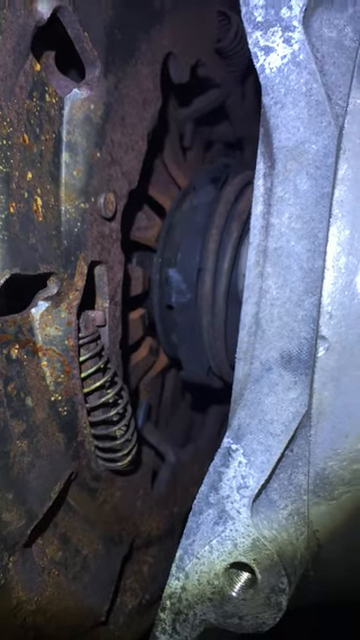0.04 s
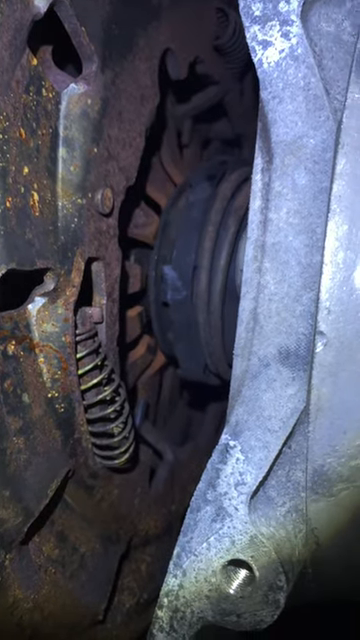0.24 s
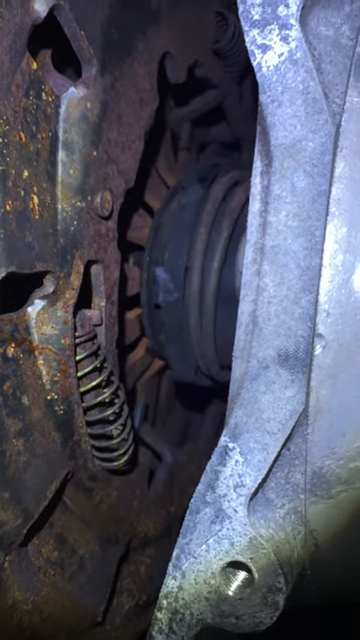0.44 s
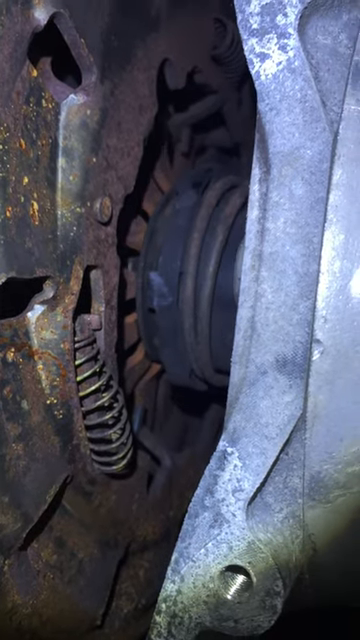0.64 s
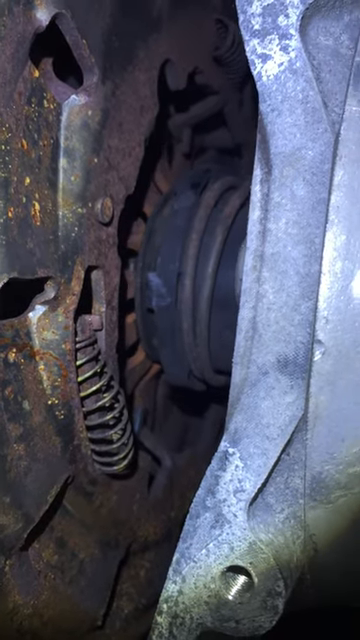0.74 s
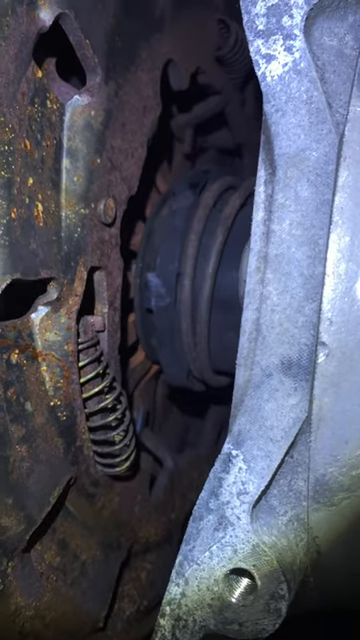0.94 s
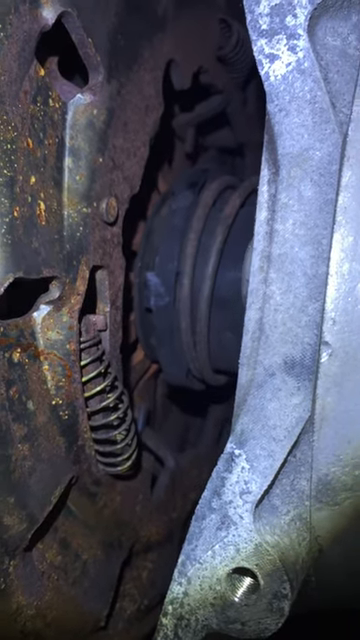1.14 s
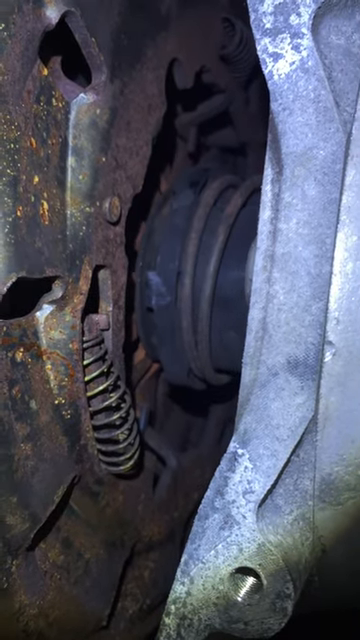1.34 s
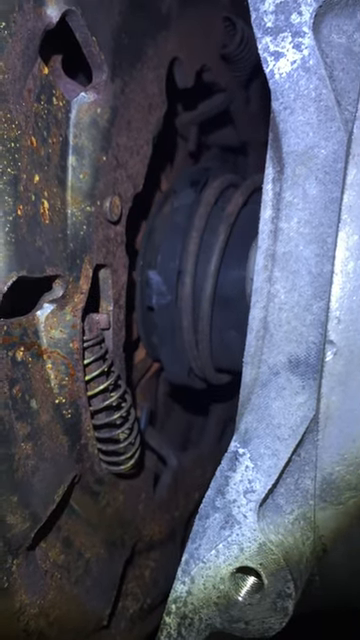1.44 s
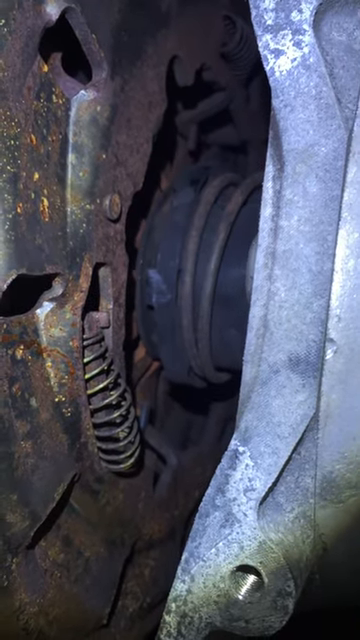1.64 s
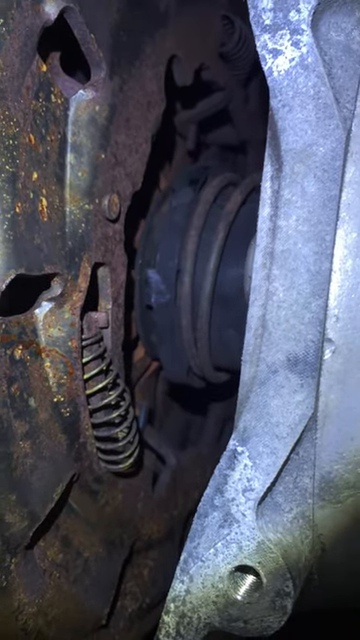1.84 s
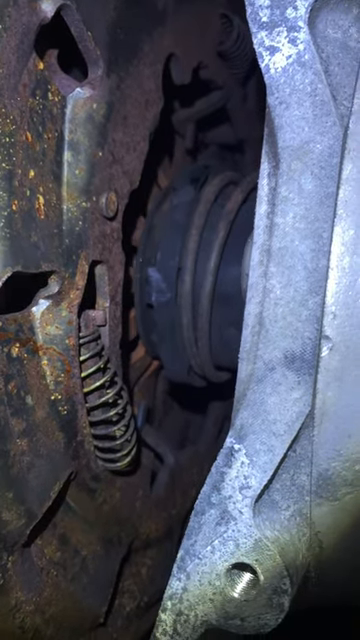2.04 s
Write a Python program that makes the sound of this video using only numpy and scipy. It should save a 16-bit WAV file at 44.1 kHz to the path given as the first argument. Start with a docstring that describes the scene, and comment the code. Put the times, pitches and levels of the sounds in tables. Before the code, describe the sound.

Close up beneath a vehicle, a metal clutch linkage gives a short squeak and a rough creak, then judders loudly against its housing and slides on with a faint whistle. Outdoors, a distant engine fades under rumble and faint insects.

```python
"""Over a low rumble come a soft knock, a falling squeak, a gritty creak and then a loud judder:
a dry clutch release mechanism is worked under a vehicle. Squeak, creak and judder are stick-slip
pulses that ring the metal bell housing close by; afterwards the metal slides on with a faint whistle.
Behind it all, an engine drone sinks away and insects sing, faint and high."""
import sys
import numpy as np
from scipy import signal
from scipy.fft import rfft, irfft
from scipy.io import wavfile
from scipy.ndimage import uniform_filter1d

SR = 44100
rng = np.random.default_rng(int(sys.argv[2]) if len(sys.argv) > 2 else 0)


def store_wav(level_fs):
    """Save 16-bit WAV to argv[1]."""
    pcm = np.round(np.clip(np.atleast_2d(level_fs), -1, 1) * 32767)
    wavfile.write(sys.argv[1], SR, pcm.T.astype(np.int16))


N = 92610


# single slips of the judder: t/s, strength/dB, extra treble/dB
JUDDER_SLIPS = [(1.1450, 8.5, -7.5), (1.1552, 9, 5.5), (1.1682, 6, 5.5), (1.1818, 0.5, 8.5),
                (1.1952, 3.5, -22)]
# its clanking tone: f/Hz, relative level/dB
JUDDER_EQ = [(220, -35), (380, -5.5), (600, -10), (780, -5.5), (890, 0.5), (1020, -8), (1210, 3),
             (1350, -1.5), (1570, 4), (1730, -0.5), (1830, -5), (2100, 4), (2400, 2), (2850, 1),
             (3500, -2.5), (4000, 1), (6400, -9), (7350, -15), (8100, -9), (9900, -13), (10600, -21.5),
             (15500, -24)]

def judder(body):
    """Five hard slips in quick succession hammer the housing."""
    return ring_housing(snaps(JUDDER_SLIPS), body, JUDDER_EQ, tones_db=-7.5)


# falling glide of the squeak: t/s, slip rate/Hz, level/dB
SQUEAK_GLIDE = [(.625, 532, -41), (.632, 509, -24.5), (.643, 464.7, -24.5), (.66, 432.7, -27.5),
                (.672, 415, -32), (.684, 393, -33.5), (.698, 383, -57.5), (.708, 374, -70)]
# its piercing tone: f/Hz, relative level/dB
SQUEAK_EQ = [(500, -15), (950, -8), (1130, -0.5), (1290, 5), (1480, -12.5), (1720, 0), (2000, -5.5),
             (2280, 2.5), (2900, -4.5), (3280, -3), (3600, -4.5), (4130, 5.5), (4650, -7.5), (6000, -7),
             (7200, -15.5), (10000, -20.5), (15500, -31)]

def squeak(body):
    """Nearly regular slips make a pitch, ringing the housing and the rubbing part's own resonance."""
    slips = stick_slip(SQUEAK_GLIDE, jitter=.022, scatter_db=1)
    squeal = undb(-8.5) * ring(slips, mode(hz=4150, t60=.028))
    return ring_housing(slips, body, SQUEAK_EQ, tones_db=-10.5) + squeal


# falling glide of the creak: t/s, slip rate/Hz, level/dB
CREAK_GLIDE = [(.728, 796, -22.5), (.741, 774.3, -25), (.75, 677, -29), (.785, 560.4, -28),
               (.803, 497.7, -28), (.832, 439.2, -28), (.845, 389, -33.5), (.862, 266, -57)]
# its darker tone: f/Hz, relative level/dB
CREAK_EQ = [(500, -5.5), (850, -9), (1250, 2.5), (1480, -5), (2500, 2), (3200, 0), (3600, -5), (4450, 0),
            (5100, -11), (6600, -10), (7700, -23), (10000, -30), (15500, -49)]

def creak(body):
    """Ragged slip timing roughens the pitch into grit."""
    slips = stick_slip(CREAK_GLIDE, jitter=.25, scatter_db=1.5)
    return ring_housing(slips, body, CREAK_EQ, tones_db=-11.5)


# ticks at the onsets of squeak and creak: t/s, strength/dB, extra treble/dB
BREAKAWAY_TICKS = [(.606, 1, -33.5), (.7282, -9, 12.5), (.7335, -6.5, 9)]
# their thin, bright tone: f/Hz, relative level/dB
TICK_EQ = [(800, -29), (1500, -9), (2100, -4), (2550, 7.5), (3300, -1), (4500, 4), (5600, -8), (6500, 3),
           (7700, -15), (9500, -18), (11000, -29), (15500, -33)]

def ticks(body):
    """The contact ticks against the housing as it breaks loose."""
    return ring_housing(snaps(BREAKAWAY_TICKS), body, TICK_EQ, tones_db=-9)


def stick_slip(glide, jitter, scatter_db):
    """The contact catches and lets go at the slip rate, each cycle different in length and force."""
    times, hz, db = np.array(glide).T
    s, slips = times[0], []
    for stretch, force in rng.standard_normal((200, 2)):
        if s < times[-1]:
            rate = np.interp(s, times, hz)
            makeup_db = 10 * np.log10(SR / rate)  # keeps the power independent of the rate
            slips.append((s, np.interp(s, times, db) + makeup_db + scatter_db * force))
            s += np.exp(jitter * stretch) / rate
    return pulses(slips)


def snaps(rows):
    """Single slips, each with its own treble tilt."""
    return sum(colour(pulses([(s, db)]), [(1210, 0), (11990, treble_db)]) for s, db, treble_db in rows)


# clear ringing tones of the clank, housing resonances and overtones of the judder's rapid repetition:
# f/Hz, level/dB, t60/s
CLANK_TONES = [(1222, -20, .28), (1494, -14, .12), (1576, -12, .12), (1620, -11, .12), (1660, -19, .38),
               (1800, -15, .1), (2090, -23, .65), (2311, -15, .12), (2431, -14, .14), (2799, -12, .11),
               (2879, -12, .11), (3015, -19, .2), (3096, -13, .15), (3243, -16, .16), (4156, -15, .1),
               (5368, -15, .1), (6380, -7, .14), (7876, -10, .08), (8371, -15, .17), (9262, -11, .08)]
# early echoes inside the housing: delay/s, relative level/dB
HOUSING_ECHOES = [(.0028, -10), (.0041, -15), (.0055, -15)]

def clank():
    """The sound of one slip: a dense ring (echoes, quick wash, duller tail) and clear ringing tones."""
    t = clock()
    attack = np.minimum(undb(-18.5) + t / .0025, 1)
    wash = energy(rng.standard_normal(N) * fade(t60=.035) * attack)
    dull_noise = signal.sosfilt(signal.butter(2, 3430, fs=SR, output="sos"), rng.standard_normal(N))
    tail = undb(-10) * energy(dull_noise * fade(t60=.14))
    tones = sum(undb(db) * energy(np.sin(2 * np.pi * (hz * t + rng.random())) * fade(t60))
                for hz, db, t60 in CLANK_TONES)
    return flatten(pulses(HOUSING_ECHOES) + wash + tail), tones


def ring_housing(force, body, eq, tones_db):
    """A contact rings the housing with its own EQ and its own share of the clank's clear tones."""
    dense, tones = body
    return ring(force, energy(colour(dense + undb(tones_db) * tones, eq)))


# soft knocks of the linkage: t/s, strength/dB
LINKAGE_KNOCKS = [(.472, -11), (1.489, -17), (1.909, -12)]

def knocks():
    """Each knock excites one dull, quickly damped resonance."""
    return ring(pulses(LINKAGE_KNOCKS), mode(hz=646, t60=.042))


# swells of the sliding metal's whistle and hiss: t/s, level/dB
WHISTLE_SWELL = [(0, -97), (1.3, -101), (1.45, -71.5), (1.65, -61.5), (1.8, -74), (2.0, -90)]
HISS_SWELL = [(0, -81), (1.05, -86), (1.3, -75), (1.6, -80), (2.1, -94)]

def sliding():
    """Metal slides on smoothly after the judder, with a faint whistle and hiss."""
    whistle = band(hz=3250, width_hz=47) * undb(curve(WHISTLE_SWELL))
    hiss = band(hz=12100, width_hz=1700) * undb(curve(HISS_SWELL))
    return whistle + hiss


# bass-heavy tone of the rumble: f/Hz, relative level/dB
RUMBLE_EQ = [(15, -74), (25, -2), (43, -14), (62, 0.5), (82, -3.5), (129, -5), (178, -11), (240, -12),
             (378, -22), (631, -23.5), (848, -25), (919, -25), (3260, -38.5), (3830, -45), (6050, -51.5),
             (6730, -53.5), (7500, -55.5), (8580, -56.5), (15500, -67)]
# its slow fader ride: t/s, level/dB
RUMBLE_RIDE = [(0, -38.5), (.3, -34.5), (.9, -36.5), (1.3, -37), (1.55, -36), (1.8, -37), (2.1, -38.5)]

def rumble():
    """A bed of deep noise that gently rises and falls."""
    return unit(colour(rng.standard_normal(N), RUMBLE_EQ)) * undb(curve(RUMBLE_RIDE))


# hollow background resonances: f/Hz, width/Hz, level/dB
HOLLOW_BANDS = [(646, 70, -52), (537, 13, -60.5), (2134, 45, -67)]
# their shared swell: t/s, gain/dB
HOLLOW_SWELL = [(0, -3), (.18, 2), (.48, -2.5), (.6, 2), (1.1, 0), (1.3, -3), (1.55, 4), (1.9, -4),
                (2.1, -9)]

def hollows():
    """Narrow bands of noise give the background a hollow ring."""
    return sum(undb(db) * band(hz, width) for hz, width, db in HOLLOW_BANDS) * undb(curve(HOLLOW_SWELL))


# the engine winding down: t/s, firing rate/Hz, level/dB
ENGINE_GLIDE = [(0, 81.4, -34), (.3, 80.86, -40), (.45, 80.7, -35), (.8, 77.23, -38.5),
                (1.05, 77.35, -41.5), (1.6, 72.86, -45), (2.1, 67.3, -53.5)]
# its harmonics 1 to 3: relative level/dB
ENGINE_HARMONICS = [4, -29, -20]

def engine():
    """A distant engine drones at its firing rate, slowing and fading."""
    phase = 2 * np.pi * np.cumsum(curve(ENGINE_GLIDE)) / SR
    drone = sum(undb(db) * np.sin(k * phase + 2 * np.pi * rng.random())
                for k, db in enumerate(ENGINE_HARMONICS, 1))
    return unit(drone) * undb(curve(ENGINE_GLIDE, axis=2))


# swell of the upper bass: t/s, level/dB
BOOM_SWELL = [(0, -77), (1.2, -57.5), (1.52, -32.5), (1.75, -44.5), (2.1, -40)]

def boom():
    """A band of low noise blooms after the judder."""
    return band(hz=103.7, width_hz=32.5) * undb(curve(BOOM_SWELL))


# steady insect trills: f/Hz, width/Hz, level/dB
INSECT_TRILLS = [(6926, 140, -73.5), (6510, 99, -80)]

def insects(first_s=.335, every_s=.267, length_s=.07):
    """One insect chirps evenly over the steady trill of others."""
    from_centre_s = (clock() - first_s + every_s / 2) % every_s - every_s / 2
    gate = np.exp(-(2 * from_centre_s / length_s) ** 6) * (clock() > first_s - length_s)
    chirps = undb(-70.5) * gate * band(hz=8390, width_hz=410)
    return chirps + sum(undb(db) * band(hz, width) for hz, width, db in INSECT_TRILLS)


def undb(db):
    """Decibels to gain."""
    return 10 ** (np.asarray(db) / 20)


def unit(x):
    """Scale to rms 1."""
    return x / np.sqrt(np.mean(x ** 2))


def energy(x):
    """Scale to energy 1."""
    return x / np.linalg.norm(x)


def clock():
    """Time of each sample in seconds."""
    return np.arange(N) / SR


def curve(rows, axis=1):
    """One column of a table, joined by straight lines in time."""
    rows = np.array(rows)
    return np.interp(clock(), rows[:, 0], rows[:, axis])


def fade(t60):
    """Decay by 60 dB every t60 seconds."""
    return undb(-60 * clock() / t60)


def mode(hz, t60):
    """One decaying resonance, energy 1."""
    return energy(np.sin(2 * np.pi * hz * clock()) * fade(t60))


def ring(x, response):
    """Let a force excite a response."""
    return signal.fftconvolve(x, response)[:N]


def colour(x, points):
    """Minimum-phase EQ through points of f/Hz, gain/dB."""
    hz, db = np.array(points).T
    f = np.maximum(np.fft.rfftfreq(2 * N, 1 / SR), 1)
    gain = undb(np.interp(np.log(f), np.log(hz), db))
    cepstrum = irfft(np.log(gain))
    cepstrum[1:N] *= 2  # fold onto positive time, so nothing rings before a hit
    cepstrum[N + 1:] = 0
    return irfft(rfft(x, 2 * N) * np.exp(rfft(cepstrum)))[:N]


def flatten(x, over_hz=124):
    """Level the broad humps of a spectrum and keep its fine peaks, energy 1."""
    power = uniform_filter1d(np.abs(rfft(x)) ** 2, int(over_hz * N / SR))
    inverse_eq = np.column_stack([np.fft.rfftfreq(N, 1 / SR), -10 * np.log10(power)])
    return energy(colour(x, inverse_eq[1:]))


def band(hz, width_hz):
    """Noise in one resonance, rms 1."""
    f = np.fft.rfftfreq(N, 1 / SR)
    return unit(irfft(rfft(rng.standard_normal(N)) / (1 + ((f - hz) / width_hz) ** 2) ** 2, N))


def pulses(rows):
    """Sharp pulses from rows of t/s, level/dB, placed between samples by a windowed sinc."""
    out, taps = np.zeros(N), np.arange(-7, 9)
    for s, db in rows:
        at = int(s * SR) + taps
        out[at % N] += undb(db) * np.sinc(at - s * SR) * np.sinc((at - s * SR) / 8)
    return out


def scene():
    """The close mechanism, its slips all ringing one housing, over the outdoor background in mono."""
    body = clank()
    clutch = judder(body) + squeak(body) + creak(body) + ticks(body) + knocks() + sliding()
    return (clutch + rumble() + hollows() + engine() + boom() + insects())[None]


def record(dry, low_cut_hz=46, high_cut_hz=15900):
    """Trim the deepest bass and the very top."""
    thin = signal.sosfilt(signal.butter(4, low_cut_hz, "high", fs=SR, output="sos"), dry)
    return signal.sosfilt(signal.ellip(10, .2, 80, high_cut_hz, fs=SR, output="sos"), thin)


dry = scene()
out = record(dry)
store_wav(out)
```